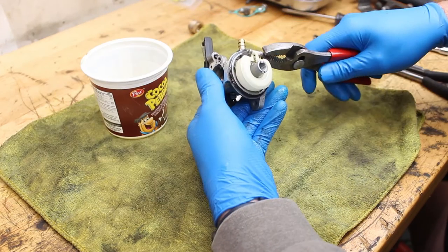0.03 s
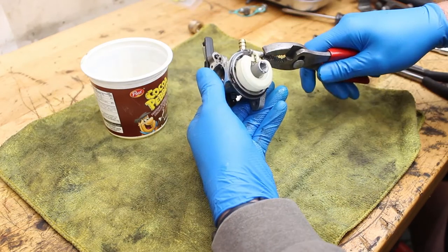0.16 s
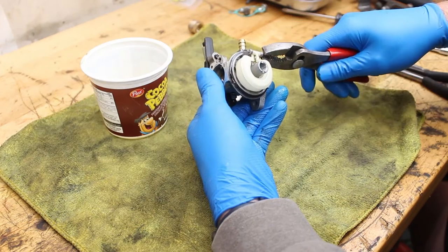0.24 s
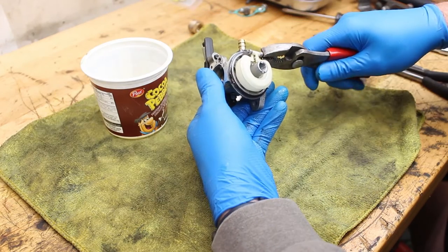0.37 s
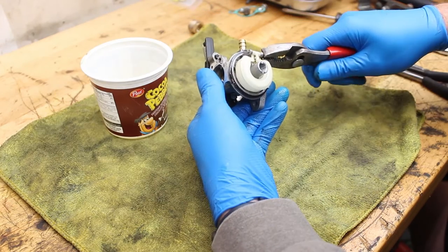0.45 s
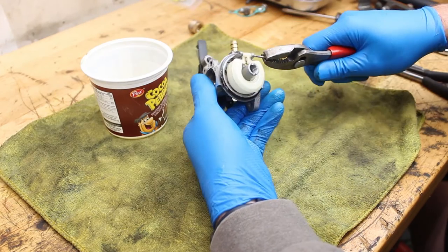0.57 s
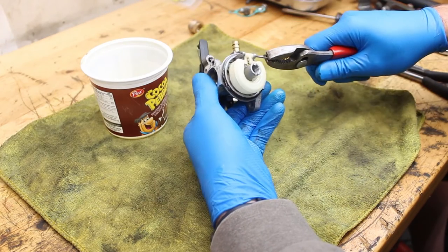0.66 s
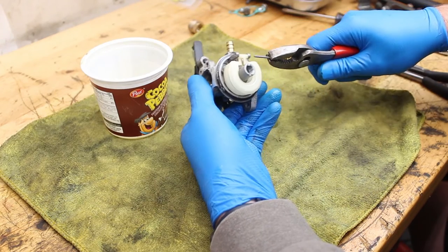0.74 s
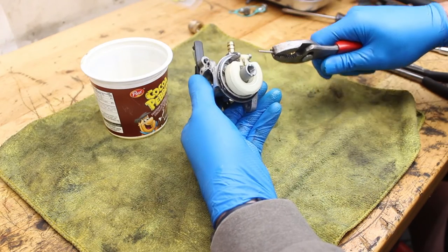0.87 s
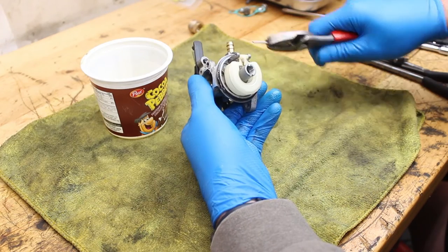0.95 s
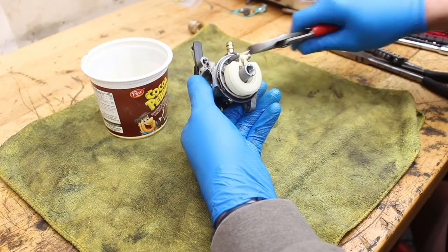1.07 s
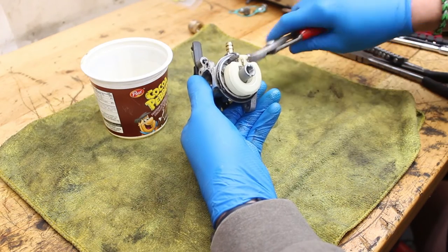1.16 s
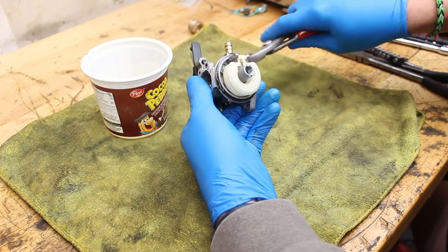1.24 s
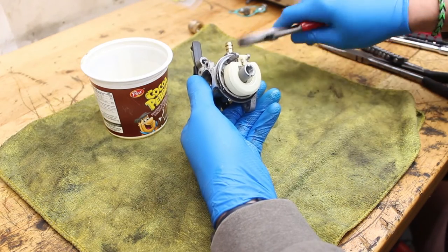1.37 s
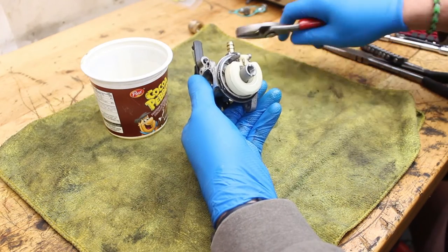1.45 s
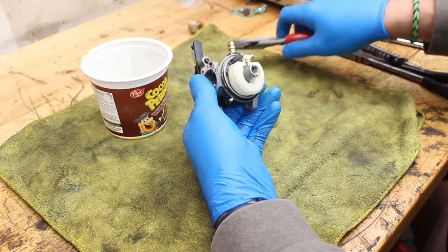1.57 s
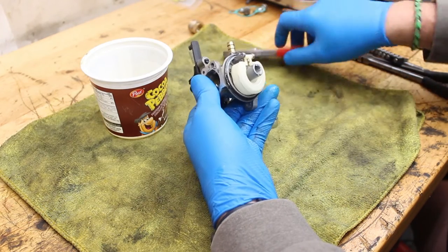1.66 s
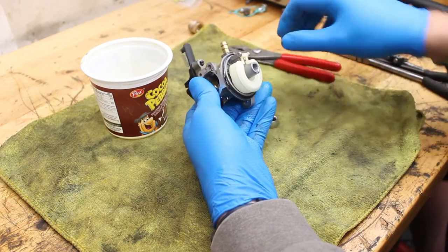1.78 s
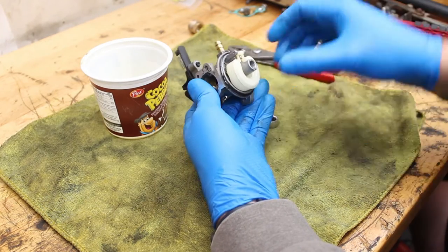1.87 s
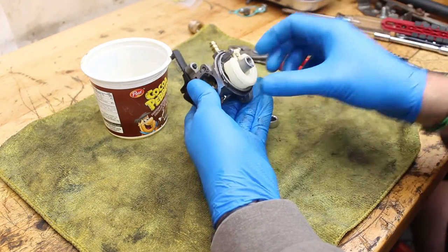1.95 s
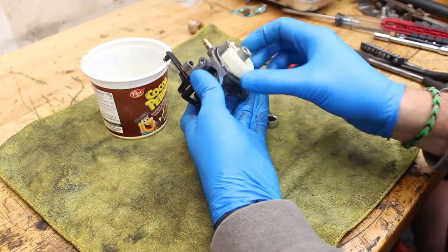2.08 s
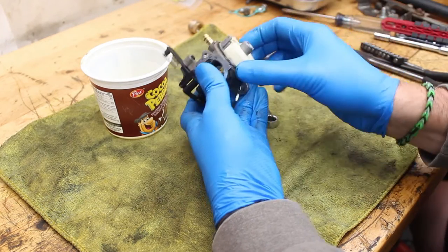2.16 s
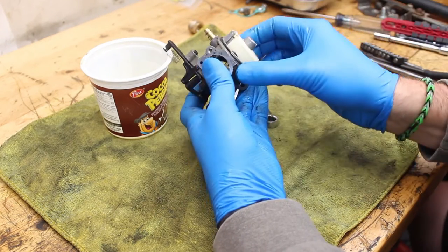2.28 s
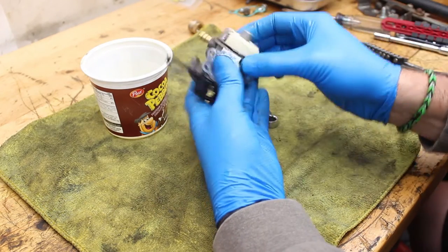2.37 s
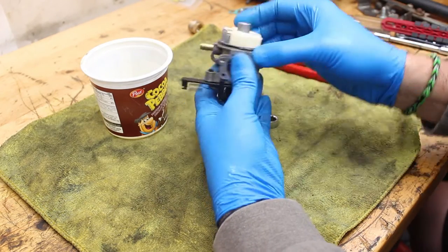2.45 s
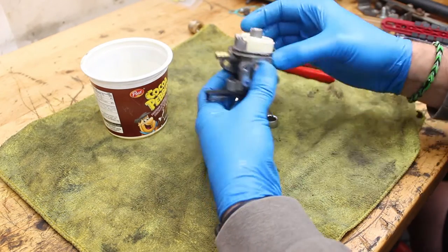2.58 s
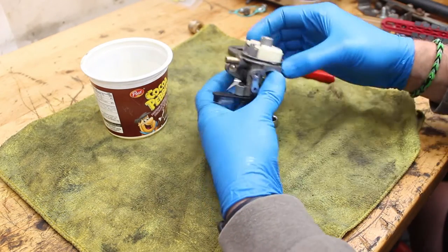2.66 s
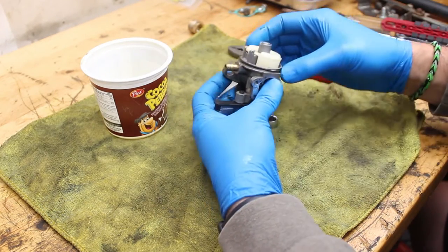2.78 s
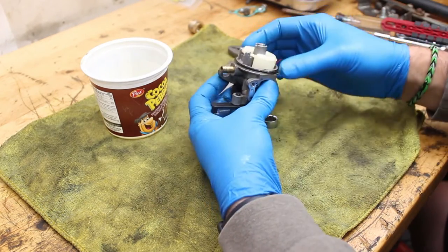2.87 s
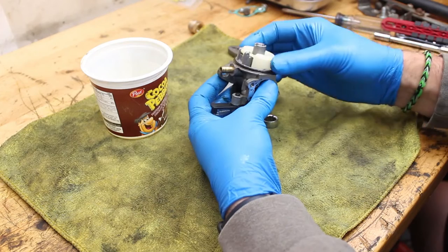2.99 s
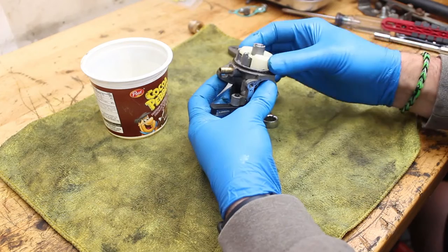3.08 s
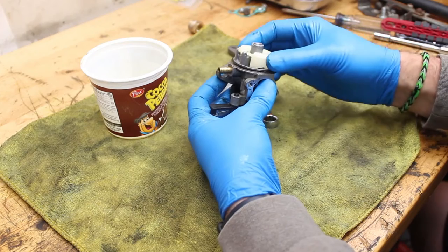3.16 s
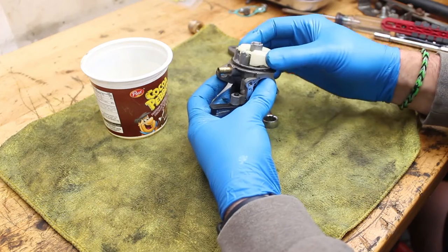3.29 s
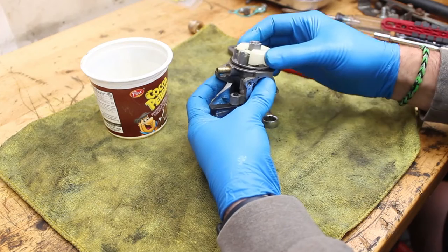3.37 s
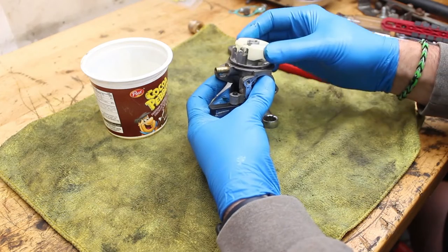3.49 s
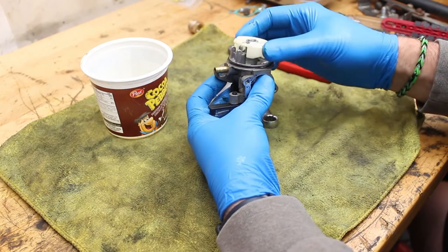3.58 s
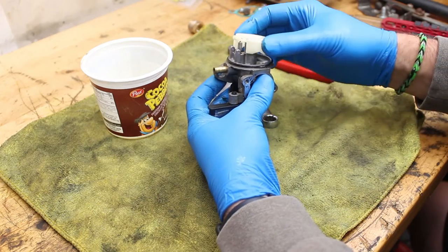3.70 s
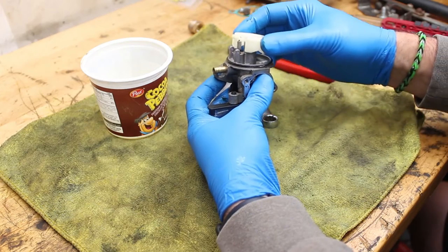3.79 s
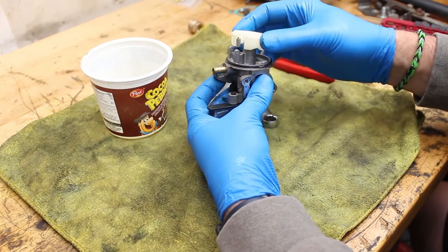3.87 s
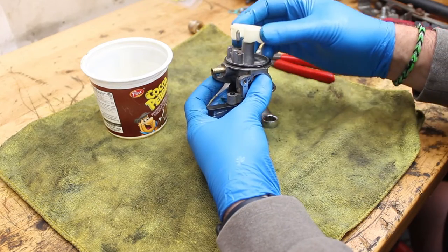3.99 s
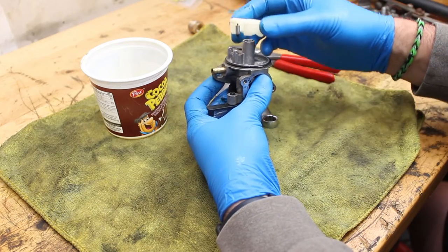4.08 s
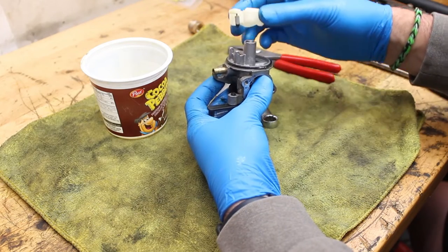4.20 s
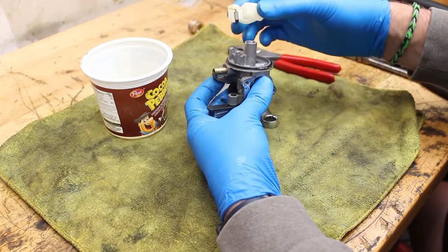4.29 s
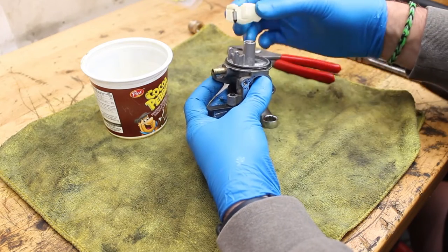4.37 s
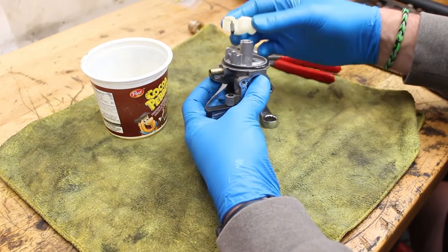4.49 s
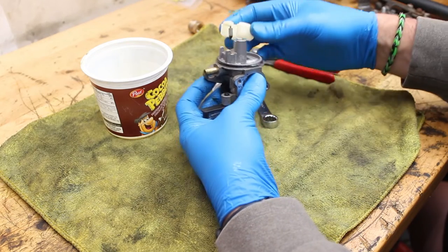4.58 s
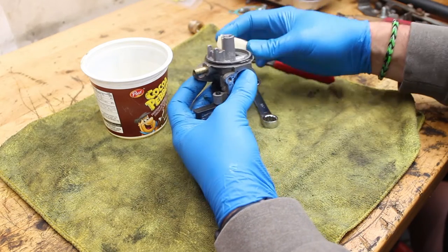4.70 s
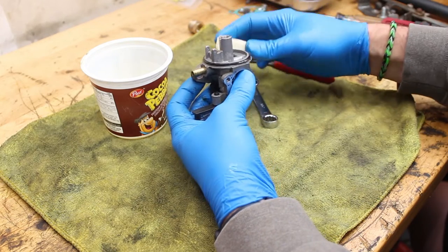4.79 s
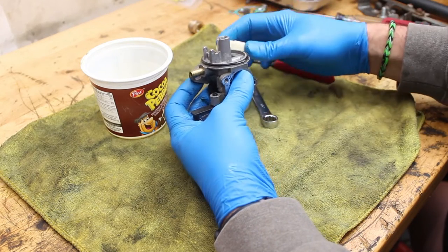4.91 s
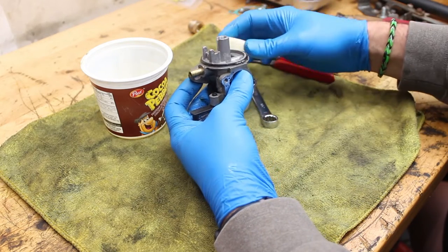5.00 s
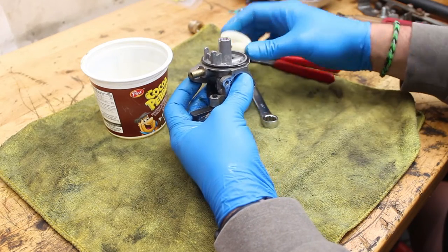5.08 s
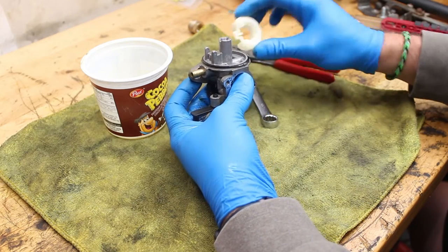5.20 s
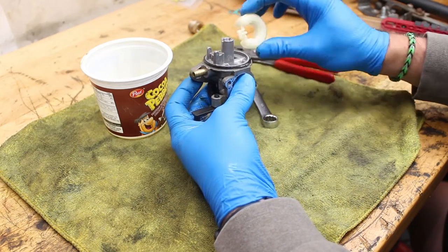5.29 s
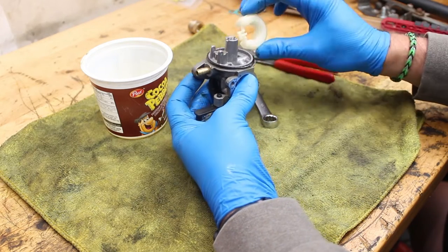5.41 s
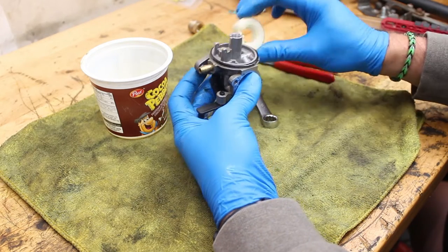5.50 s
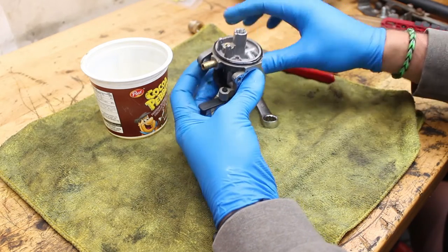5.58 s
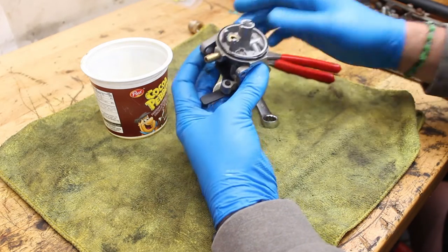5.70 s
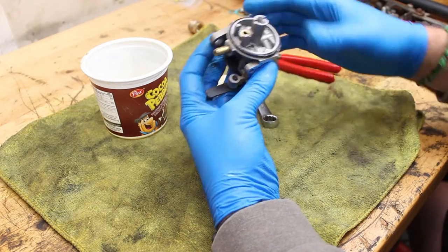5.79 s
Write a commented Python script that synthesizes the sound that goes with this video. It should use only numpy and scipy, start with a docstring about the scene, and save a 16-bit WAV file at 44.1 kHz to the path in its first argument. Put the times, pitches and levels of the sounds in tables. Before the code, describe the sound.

In a quiet workshop, close to the microphone, small parts tick faintly as a pin is pulled. Loose steel clinks and rocks on a wrench, then pliers drop and bounce on rag-covered wood. Sleeve and rubber glove rustle through a mostly quiet middle. Another short clink and rattle follows, and finally a metal casting knocks loudly against the steel.

```python
"""A quiet workshop bench: gloved hands pull a hinge pin from a small carburettor and lift off its float.
Loose steel clinks and rocks on a spanner, a casting knocks it, pliers drop on rag-covered wood: decaying modes
plus dense, damped chatter. Parts tick as filtered clicks; sleeve, sliding part and glove are broken-up noise.
Two very short, narrow-pitched ticks glide up; a dull wash follows each hit over a low room rumble and hiss."""
import sys
import numpy as np
from scipy import signal
from scipy.fft import rfft, irfft
from scipy.io import wavfile
from scipy.ndimage import uniform_filter1d

SR = 44100
rng = np.random.default_rng(int(sys.argv[2]) if len(sys.argv) > 2 else 0)


def transcribe(u):
    """Save the signal u as a 16-bit wav file named by the first command-line argument.

    u: samples, shape (n,) or (channels, n), limited to [-1, 1]; the rate is SR.
    q: integer samples, one column per channel.
    """
    v = np.clip(np.atleast_2d(u).T, -1, 1)
    q = np.round(v * 32767).astype(np.int16)
    wavfile.write(sys.argv[1], SR, q)


N = 257980


def undb(db):
    """Decibels to amplitude."""
    return 10 ** (np.asarray(db) / 20)


def unit(x):
    """Scale to rms 1."""
    return x / np.sqrt(np.mean(x ** 2))


def decay(t, t60_s):
    """Exponential fade, 60 dB down at t60_s."""
    return np.exp(-np.log(1000) * t / t60_s)


def coloured(spectrum):
    """Noise of rms 1 whose spectrum follows the given shape."""
    hz, db = np.transpose(spectrum)
    f = np.fft.rfftfreq(N, 1 / SR) + 1  # keeps the logarithm finite at zero
    shape = undb(np.interp(np.log(f), np.log(hz), db))
    return unit(irfft(rfft(rng.standard_normal(N)) * shape, N))


def band(x, hz, width_hz):
    """One resonance, gain 1 at the centre."""
    b, a = signal.iirpeak(hz, hz / width_hz, fs=SR)
    return signal.lfilter(b, a, x)


def highpass(x, hz):
    """Roll off the bass below hz."""
    return signal.sosfilt(signal.butter(4, hz, "highpass", fs=SR, output="sos"), x)


def walk(rate):
    """Random levels held 1 / rate seconds and slewed twice; spread near 1."""
    hold = int(SR / rate)
    steps = np.repeat(rng.standard_normal(N // hold + 1), hold)
    return 0.79 * uniform_filter1d(uniform_filter1d(steps, hold), hold)[:N]


def gain(curve):
    """Level curve (s, dB) to a gain at every sample."""
    return undb(np.interp(np.arange(N) / SR, *np.transpose(curve)))


def add(out, start_s, x):
    """Mix a sound into the track at its start time."""
    i = int(start_s * SR)
    out[i:i + len(x)] += x[:N - i]


def struck(blows, modes, scatter_db, touch_db, contact_s, ring_share):
    """Every blow starts all modes; its spot tilts them, ring_share shortens them, later contacts sap them."""
    hz, mode_db, t60_s = np.array(modes).T[:, :, None]
    octave = np.log2(hz / np.exp(np.log(hz).mean()))  # distance from the middle mode
    starts = np.array([blow[0] for blow in blows])
    chance = rng.standard_normal((len(blows), 2, len(modes), 1))
    ring_s = t60_s * ring_share
    t = np.arange(int(ring_s.max() * SR)) / SR
    out = np.zeros(N)
    for (start_s, peak_db, tilt_db, *lowest_db), (scatter, drift) in zip(blows, chance):
        since_later = start_s + t - starts[starts > start_s, None]
        later_contacts = np.clip(since_later / 0.00056, 0, 1).sum(0)  # each takes 0.56 ms to bite
        attack = np.sin(np.pi / 2 * np.minimum(t / contact_s, 1)) ** 2
        level_db = peak_db + mode_db + tilt_db * octave + scatter_db * scatter
        level_db = level_db + sum(lowest_db) * (hz == hz.min())  # only some tables set the lowest mode
        wave = np.sin(2 * np.pi * hz * (1 + drift / 1000) * t)
        ringing = (undb(level_db) * decay(t, ring_s) * wave).sum(0)
        add(out, start_s, attack * undb(-touch_db * later_contacts) * ringing)
    return out


def chatter(blows, modes, blur, start_db, quick_t60_s, linger_db, slow_t60_s):
    """Blows shake loose dense tiny contacts on damped modes; most die at once, a few linger."""
    power, t = np.zeros(N), np.arange(SR // 2) / SR
    fade = undb(start_db - 60 * t / quick_t60_s) + undb(linger_db - 60 * t / slow_t60_s)
    for start_s, peak_db, *_ in blows:
        add(power, start_s, (undb(peak_db) * fade) ** 2)
    grains = rng.standard_normal(N) * undb(3.7 * walk(400))
    body = np.zeros(N)
    for k, (hz, mode_db, _) in enumerate(modes):
        sign = (-1) ** k
        body += sign * undb(.5 * mode_db) * band(grains, hz, blur * hz)  # half the mode's dB contrast
    return unit(body) * np.sqrt(power)


def strokes(rows, fade_db_s, edge_s):
    """Each stroke swells in, fades while it lasts and lets go."""
    t = np.arange(N) / SR

    def ramp(u):
        return np.clip(u / edge_s + .5, 0, 1) ** 2

    out = np.zeros(N)
    for start_s, length_s, level_db in rows:
        fade_db = fade_db_s * np.clip(t - start_s, 0, length_s)
        out += undb(level_db - fade_db) * ramp(t - start_s) * ramp(start_s + length_s - t)
    return out


# colour of the room rumble and microphone hiss, relative: pitch_hz, level_db_per_hz
ROOM_COLOUR = [(20, -29.5), (45, -26.5), (85, -22.5), (110, -10.5), (210, -7), (255, -0.5), (330, -8.5),
               (640, -16.5), (1330, -18.5), (2300, -20.5), (6000, -24), (13500, -25.5), (16000, -27.5)]
ROOM_DB = -55.5


def room_tone():
    """Steady low rumble and hiss as one coloured noise whose level wanders slightly."""
    return coloured(ROOM_COLOUR) * undb(ROOM_DB + 0.34 * walk(7.1))


# sleeve drag level, before its flicker: time_s, level_db
SLEEVE_LEVEL = [(0.0, -60.5), (0.41, -60), (0.58, -63), (0.93, -51.5), (1.07, -60.5), (1.42, -94),
                (1.65, -52.5), (1.92, -43.5), (2.51, -48), (2.61, -60), (2.88, -56), (3.32, -63.5),
                (4.69, -59.5), (4.77, -52.5), (5.31, -48.5), (5.75, -51), (5.85, -64)]
# colour of cloth on wood, relative: pitch_hz, level_db_per_hz
CLOTH_COLOUR = [(59, -54), (100, -28), (250, 1.5), (348, -7.5), (446, -2), (671, -8.5), (881, -7.5),
                (1090, -19.5), (1500, -29), (1950, -32), (3300, -56)]


def sleeve_drag():
    """Cloth dragged on wood: dull noise broken up by stick and slip."""
    return coloured(CLOTH_COLOUR) * undb(3.5 * walk(25)) * gain(SLEEVE_LEVEL)


# a part slides in its bore, levels before fade and flicker: start_s, length_s, level_db
SLIDE_STROKES = [(.805, 0.166, -51), (4.55, 0.15, -57)]
SLIDE_HZ, SLIDE_WIDTH_HZ = 1647, 99
SLIDE_FADE_DB_S, SLIDE_EDGE_S = 83, 0.01


def sliding_part():
    """A faint squeak: narrow noise broken up by stick and slip."""
    squeak = unit(band(rng.standard_normal(N), SLIDE_HZ, SLIDE_WIDTH_HZ))
    return squeak * undb(4.4 * walk(62)) * strokes(SLIDE_STROKES, SLIDE_FADE_DB_S, SLIDE_EDGE_S)


# rubber glove rustles, levels before the fade: start_s, length_s, level_db
GLOVE_STROKES = [(.59, 0.068, -56.5), (2.135, 0.027, -41.5), (2.37, 0.076, -49), (2.445, 0.045, -44.5),
                 (2.6, 0.15, -56.5)]
RUSTLE_FADE_DB_S, RUSTLE_EDGE_S = 15, 0.015


def glove_rustle():
    """Rubber sticks and slips: grainy noise through a bright and a middle resonance."""
    grains = rng.standard_normal(N) * undb(9.3 * walk(450))
    bright = band(band(grains, 4500, 2600), 6800, 2500)
    middle = 1.05 * band(grains, 2100, 1300)
    return unit(bright + middle) * strokes(GLOVE_STROKES, RUSTLE_FADE_DB_S, RUSTLE_EDGE_S)


# two very short, narrow-pitched ticks close together; the swell tops out at 1/e of the level:
# start_s, level_db, starting_pitch_hz
GLIDING_TICKS = [(3.4892, -28.5, 1670), (3.496, -35, 1820)]
GLIDE_HZ_S, GLIDE_ATTACK_S = 90000, 0.0014


def gliding_ticks():
    """A few sine cycles that swell, fade and glide up."""
    out, t = np.zeros(N), np.arange(600) / SR
    swell = t / GLIDE_ATTACK_S * np.exp(-t / GLIDE_ATTACK_S)
    for start_s, level_db, hz in GLIDING_TICKS:
        glide = np.sin(2 * np.pi * (hz + GLIDE_HZ_S * t / 2) * t)
        add(out, start_s, undb(level_db) * swell * glide)
    return out


# blows that reach the bench top: start_s, peak_db, tilt_db_per_octave
BENCH_BLOWS = [(1.710, -32, 6), (1.7575, -10, -2), (1.770, -32, 25), (1.836, -21, -6), (2.14, -53.5, 7),
               (4.305, -46, -8), (4.32, -44, -4.5), (5.21, -46.5, -1)]
# modes of the wooden top, before damping: pitch_hz, level_db, t60_s
BENCH_MODES = [(132, -15.5, 0.16), (184.2, -2.5, 0.24), (247, -9.5, .12), (323.4, -2.5, .13),
               (409, 1, 0.083), (437, -4, .2), (500.5, -3.5, .08), (560, 2, .08), (580, -6.5, 0.0702),
               (673, -10.5, 0.04), (740, -17.5, 0.092), (1000, -30, 0.036)]


def bench_thuds():
    """Low wooden modes under a soft contact, with loose chatter; the top radiates little bass."""
    thuds = struck(BENCH_BLOWS, BENCH_MODES, scatter_db=1.3, touch_db=1.7, contact_s=0.0026, ring_share=.6)
    loose = chatter(BENCH_BLOWS, BENCH_MODES, blur=.15, start_db=-11.5, quick_t60_s=.2,
                    linger_db=-25.5, slow_t60_s=0.95)
    return highpass(thuds + loose, 135)


# dry ticks of parts, pliers and glove; treble is relative to the peak, width to the centre:
# start_s, peak_db, centre_hz, treble_db, width_share
PART_TICKS = [(0.0273, -40, 1460, -6, 0.31), (0.105, -49, 1240, -13, 0.63), (0.184, -39.5, 1000, -16, 0.45),
              (0.279, -44, 1670, -12, 0.3), (0.393, -29, 1830, -9, 0.35), (0.4387, -32.5, 1850, -5, 0.4),
              (0.467, -44, 1830, -16, 0.87), (0.5453, -40.5, 1750, -6, .9), (0.609, -36, 4470, -2, .7),
              (0.629, -29, 2100, -1.5, 1), (0.7574, -16.5, 3080, -22, 0.63), (0.7985, -23, 3250, -30, 0.13),
              (1.3597, -23.5, 2100, -10, 0.63), (1.586, -39.5, 1910, 1, .7), (1.6271, -28, 1680, 5.5, 0.52),
              (1.836, -12, 3230, 1.5, 0.25), (2.0515, -35, 2440, -16, 0.81), (2.141, -25, 2350, 0, 0.38),
              (2.2235, -34, 1460, 2, 1), (2.354, -38, 1110, 3, .95), (2.3823, -36, 2350, -16, 0.5),
              (2.39, -30.5, 2280, -10, .85), (2.4165, -45, 1840, 8, .8), (2.4483, -34, 2040, -5, .9),
              (2.4675, -29, 3780, -25, .6), (2.621, -40.5, 1020, -15, 0.77), (2.6524, -33.5, 2430, -7, .9),
              (2.6947, -26.5, 3200, 5.5, 1), (2.7213, -37, 1580, -18, .4), (2.8197, -37, 3263, -3.5, 1),
              (3.2048, -54, 1106, 11.5, .7), (4.8477, -18, 1580, 9, 1), (4.887, -18.5, 1970, 7, 0.46),
              (5.673, -33.5, 2990, 0, 0.56), (5.6851, -12, 2360, 2.5, 0.89), (5.6995, -5.5, 2350, -9, 0.33),
              (5.7534, -17, 4370, -6, 0.18), (5.764, -19, 1650, 1.5, 1)]
TICK_T60_S = 0.03


def ticks():
    """A click with a short noise tail, through a broad resonance, a duller body under it and one of treble."""
    out, t = np.zeros(N), np.arange(3000) / SR
    chance = rng.standard_normal((len(PART_TICKS), 2, len(t)))
    for (start_s, peak_db, hz, treble_db, width_share), noise in zip(PART_TICKS, chance):
        burst = noise * decay(t, TICK_T60_S) + 9 * (t == 0)
        width_hz = width_share * hz
        main = band(band(burst[0], hz, width_hz), hz, 1.5 * width_hz)
        body = main + 0.4 * band(burst[0], 0.61 * hz, .5 * hz)
        treble = band(band(burst[1], 7000, 4490), 7000, 4490)
        mix = body / np.abs(body).max() + undb(treble_db) * treble / np.abs(treble).max()
        add(out, start_s, undb(peak_db) * mix)
    return out


# the carburettor casting knocks the spanner: start_s, peak_db, tilt_db_per_octave
CASTING_KNOCKS = [(5.685, -4, -0.5), (5.688, -7.5, 10.5), (5.700, -18, 21), (5.724, -24.5, -10),
                  (5.755, -26, 6), (5.764, -28.5, -12.5), (5.821, -27.5, -8)]
# modes of the casting, before damping: pitch_hz, level_db, t60_s
CASTING_MODES = [(645, -7, 0.0053), (1077, -4.5, 0.0065), (1370, -23, 0.013), (1754, -11, 0.12),
                 (2250, -0.5, 0.019), (2524, -3, 0.015), (2890, -19, 0.048), (4560, -21.5, 0.012),
                 (8220, -35.5, 0.026), (10800, -41.5, 0.012)]


def casting_knocks():
    """Mostly short, dull modes of the casting, with damped chatter on the same modes."""
    knocks = struck(CASTING_KNOCKS, CASTING_MODES, scatter_db=4.9, touch_db=2.6, contact_s=0.0008, ring_share=0.89)
    loose = chatter(CASTING_KNOCKS, CASTING_MODES, blur=0.11, start_db=-16.5, quick_t60_s=0.049,
                    linger_db=-37.5, slow_t60_s=0.94)
    return knocks + loose


# pliers fall and bounce: start_s, peak_db, tilt_db_per_octave, lowest_mode_db
PLIER_FALLS = [(1.7031, -5.5, -12.5, -22), (1.7075, -8.5, -9, -22), (1.718, -18, 16, -14),
               (1.7465, -14, -16.5, -17), (1.751, -8, 0, -20), (1.7575, -32, 11, -10),
               (1.766, -15, -3.5, 9.5), (1.773, -14.5, -10, -6), (1.782, -33, 16, -9), (1.8343, -38, 7, -7),
               (1.850, -30, -6, 4)]
# modes of the whole pliers, before damping: pitch_hz, level_db, t60_s
PLIER_MODES = [(2185, -19, .45), (4445, -18, .065), (5114, -15, .035), (6767, -15, .06), (7550, -10, .06),
               (7393, -2, .22), (7940, -8.5, .04), (9310, -24, 0.18), (10760, -20.5, .05),
               (11080, -18.5, .1), (11700, -27, .08), (13740, -38.5, .1), (15498, -24.5, .15)]
# the same pliers touched while resting on one handle: start_s, peak_db, tilt_db_per_octave
JAW_TOUCHES = [(1.6195, -30.5, 6), (1.628, -31, -1.5)]
# modes of the pliers resting so, before damping: pitch_hz, level_db, t60_s
HANDLE_MODES = [(1428, -1.5, 0.064), (4380, -0.5, 0.035), (7740, -1, 0.028)]
# one half slaps the other on the last bounce: start_s, peak_db, tilt_db_per_octave
HALF_SLAPS = [(1.8345, -25.5, 8), (1.848, -33, -4.5)]
# modes of one half, before damping: pitch_hz, level_db, t60_s
HALF_MODES = [(1460, -5.5, 0.077), (2012, -2.5, 0.36), (3230, -1, 0.065), (4350, -14, 0.28),
              (5490, -9.5, 0.16), (5654, -14, 0.23)]


def pliers():
    """Steel modes of the whole tool, of its rest on one handle and of its slapping half, with chatter."""
    falls = struck(PLIER_FALLS, PLIER_MODES, scatter_db=1.8, touch_db=2.1, contact_s=.0003, ring_share=.8)
    touches = struck(JAW_TOUCHES, HANDLE_MODES, scatter_db=1.3, touch_db=3, contact_s=0.0003, ring_share=.9)
    slaps = struck(HALF_SLAPS, HALF_MODES, scatter_db=0.93, touch_db=6.2, contact_s=0.00051, ring_share=0.88)
    low_mode = CASTING_MODES[1:2]  # a low mode near 1.1 kHz fills out the pliers' rattle
    loose_modes = PLIER_MODES[:10] + HALF_MODES + low_mode
    loose = chatter(PLIER_FALLS + HALF_SLAPS, loose_modes, blur=0.055, start_db=-12, quick_t60_s=0.079,
                    linger_db=-36.5, slow_t60_s=0.63)
    return falls + touches + slaps + loose


# the spanner under the steel part is struck; its lowest mode is weak near its nodes:
# start_s, peak_db, tilt_db_per_octave, lowest_mode_db
SPANNER_TAPS = [(1.258, -42, 4, 18), (1.268, -41, 5.5, 14), (1.302, -21, 0.5, -17), (1.345, -57, 9, 7),
                (1.368, -51.5, 1.6, 15.5), (4.862, -45.5, 3.5, 10), (4.877, -45, 1, 13.5),
                (4.888, -15, 7.5, 3), (4.933, -48, 5, -22), (4.96, -52, 1, -19), (5.024, -53, 5.5, 21),
                (5.075, -56, 0.5, 1), (5.686, -27.5, 5, -2.5), (5.724, -23, -2.5, -8),
                (5.821, -37, -11, -20)]
# modes of the spanner, before damping: pitch_hz, level_db, t60_s
SPANNER_MODES = [(1868, 0, .5), (5017, -11.5, .28), (9277, -1.5, .1), (13540, -18, .09)]


def spanner_taps():
    """A few widely spaced modes of a steel bar, strongly sapped by each later contact."""
    return struck(SPANNER_TAPS, SPANNER_MODES, scatter_db=0.89, touch_db=18, contact_s=0.00051, ring_share=0.81)


# a small hollow steel part (nut or socket) knocked and rocking: start_s, peak_db, tilt_db_per_octave
SOCKET_CLINKS = [(1.256, -2, 26), (1.2607, -18, 0), (1.2663, -0.5, 27), (1.2717, -13.5, 0),
                 (1.2864, -14.5, 16), (1.3194, -26, 4), (1.3593, -15.5, 23), (1.3814, -34, -2),
                 (1.3963, -28.5, 13), (1.4296, -38, 7), (1.4596, -39, 23), (1.4895, -39, 9),
                 (1.5138, -32, 21), (1.5509, -41, 15), (1.5765, -42, 11), (4.8488, -5, -9),
                 (4.8562, -6.5, -13), (4.8714, -26, -1), (4.9264, -33, -11), (4.9583, -40, -11),
                 (5.0968, -32, -4), (5.1302, -35.5, 5), (5.1745, -42.5, -8), (5.1961, -43, -11),
                 (5.2195, -45, -3), (5.2314, -45.5, 1), (5.2454, -49.5, -10.5), (5.6959, -9.5, 21),
                 (5.7004, -15, 10), (5.712, -31, -2), (5.7321, -7.5, 21), (5.7534, -33, -5),
                 (5.7678, -20.5, 16), (5.8202, -42, -9)]
# modes of the hollow part, before damping: pitch_hz, level_db, t60_s
SOCKET_MODES = [(6470, -5, 0.04), (6540, -15.5, .06), (6950, -17.5, 0.045), (8840, -9.5, .035),
                (8970, -5, 0.029), (11500, -39.5, 0.017), (12790, -38, 0.018), (12960, -36, .06)]
# two dull modes of what the part lies on, before damping: pitch_hz, level_db, t60_s
SEAT_MODES = [(2350, 1.5, 0.018), (2820, -3.5, 0.044)]
SEAT_DB, SEAT_DB_PER_DB = -24, 0.66  # jolt for a 0 dB clink, and its growth with the clink


def socket_clinks():
    """High, short steel modes; each clink also jolts its seat, with a slower attack and less contrast."""
    jolts = [(start_s, SEAT_DB + SEAT_DB_PER_DB * peak_db, 0) for start_s, peak_db, _ in SOCKET_CLINKS]
    clinks = struck(SOCKET_CLINKS, SOCKET_MODES, scatter_db=1.5, touch_db=12, contact_s=.0003, ring_share=.9)
    seat = struck(jolts, SEAT_MODES, scatter_db=3, touch_db=3, contact_s=0.00067, ring_share=.9)
    loose_part = chatter(SOCKET_CLINKS, SOCKET_MODES, blur=.025, start_db=-29.5, quick_t60_s=0.13,
                         linger_db=-46, slow_t60_s=.7)
    loose_seat = chatter(jolts, SEAT_MODES, blur=.2, start_db=-18.5, quick_t60_s=.1,
                         linger_db=-35, slow_t60_s=.4)
    return clinks + seat + loose_part + loose_seat


TAIL_T60_S, TAIL_DB = 0.31, -15


def tail(hits):
    """Bench clutter and near walls answer each hit with a short dull wash."""
    t = np.arange(int(.5 * SR)) / SR
    wash = band(rng.standard_normal(len(t)), 2000, 6000) * decay(t, TAIL_T60_S)
    wash /= np.sqrt(np.sum(wash ** 2))  # unit energy
    return signal.fftconvolve(hits, wash)[:N] * undb(TAIL_DB)


def scene():
    """Mix room and rubbing under the hits and their wash."""
    rubbing = sleeve_drag() + sliding_part() + glove_rustle()
    small_parts = gliding_ticks() + ticks() + casting_knocks() + pliers() + spanner_taps() + socket_clinks()
    hits = bench_thuds() + highpass(small_parts, 480)  # small parts radiate no bass
    return (room_tone() + rubbing + hits + tail(hits))[None]


TOP_HZ = 16000


def record(dry):
    """The converter clips the loudest peaks; the top is cut."""
    clipped = np.clip(dry, -.93, .93)
    return signal.sosfilt(signal.ellip(12, .2, 90, TOP_HZ, fs=SR, output="sos"), clipped)


dry = scene()
out = record(dry)
transcribe(out)
```